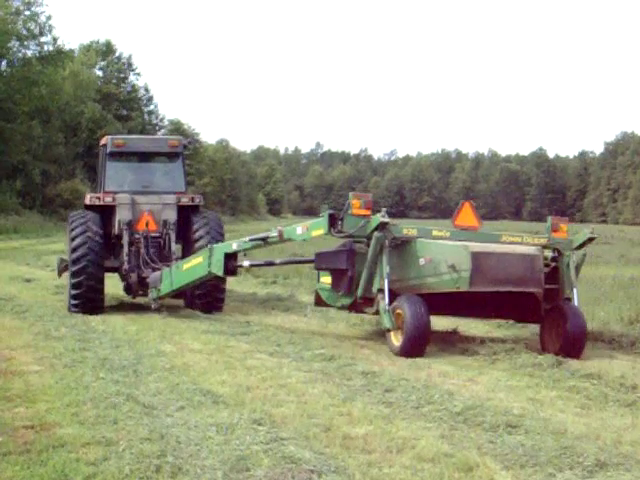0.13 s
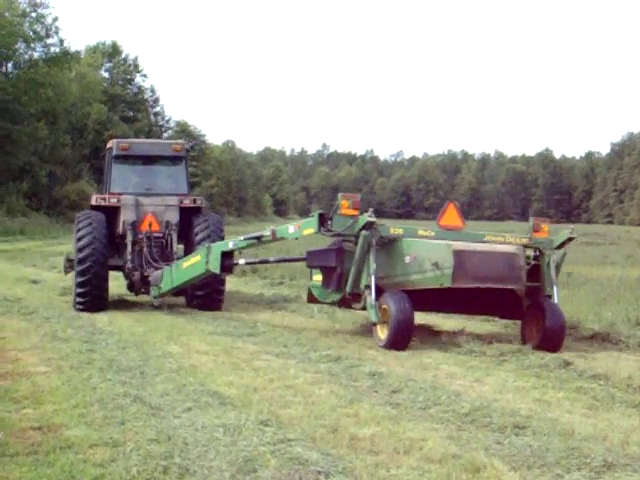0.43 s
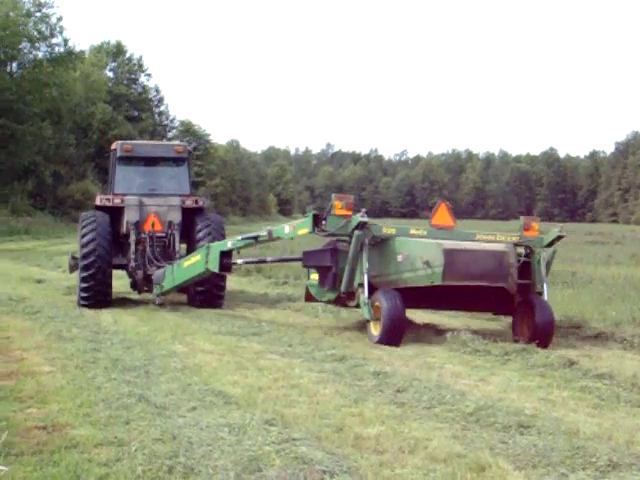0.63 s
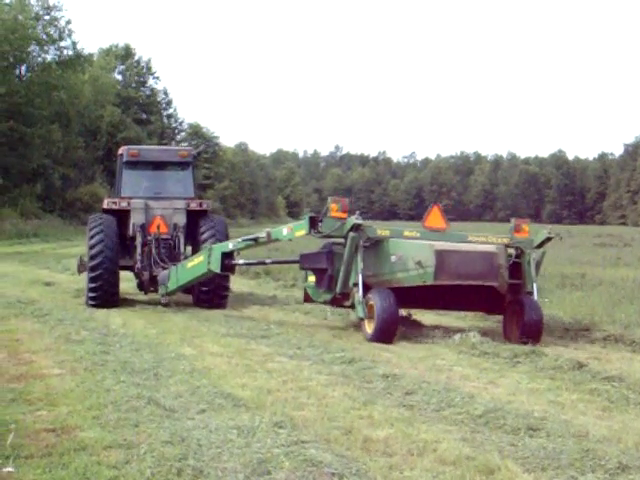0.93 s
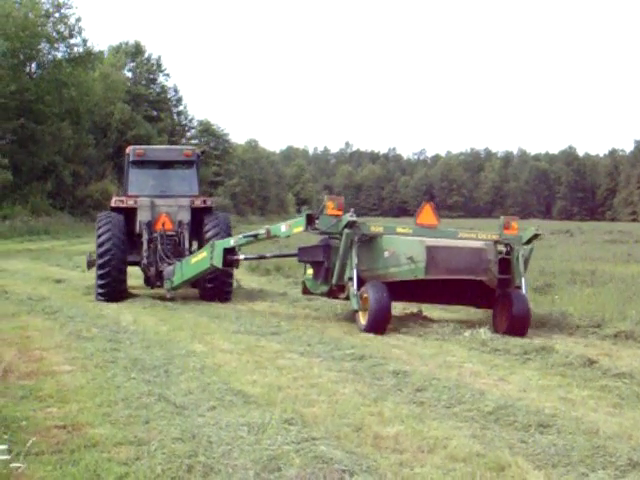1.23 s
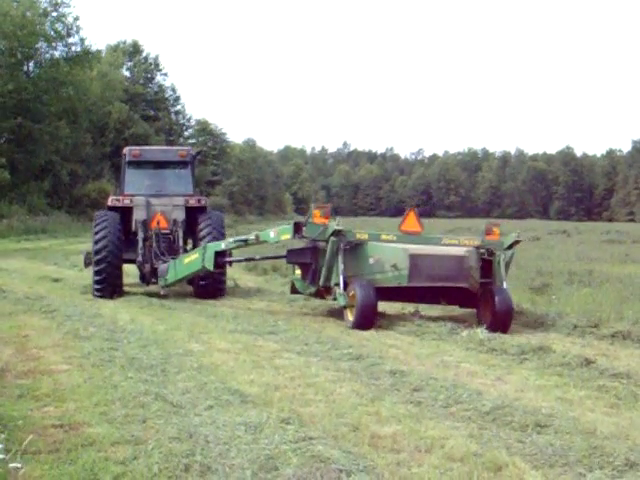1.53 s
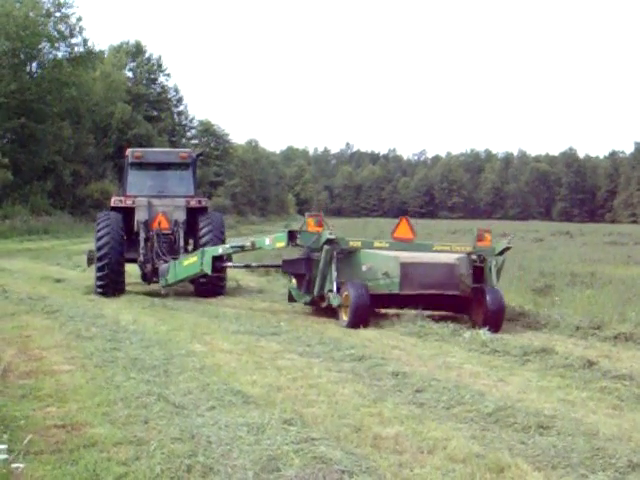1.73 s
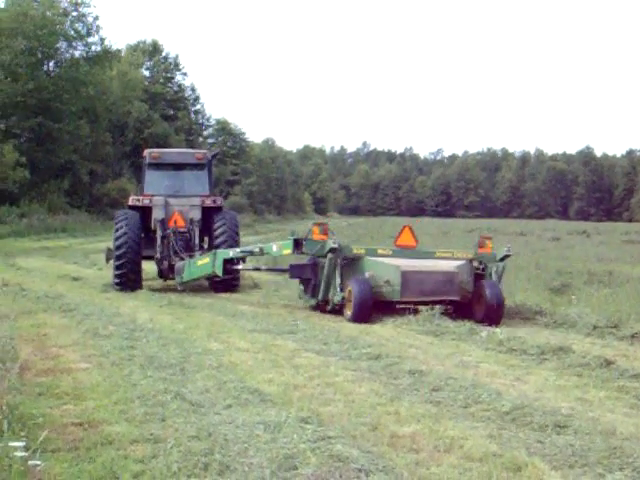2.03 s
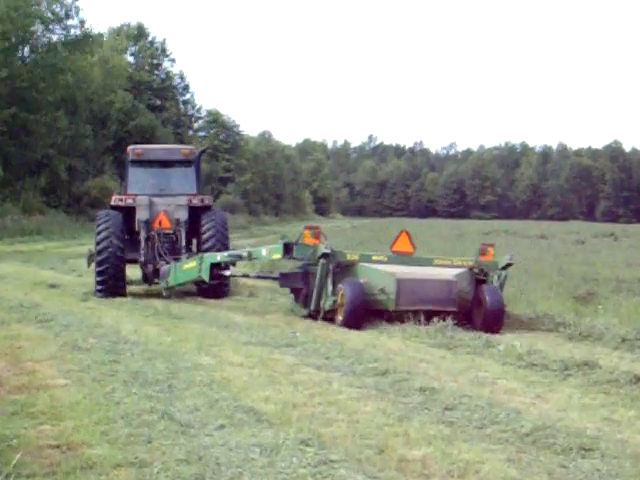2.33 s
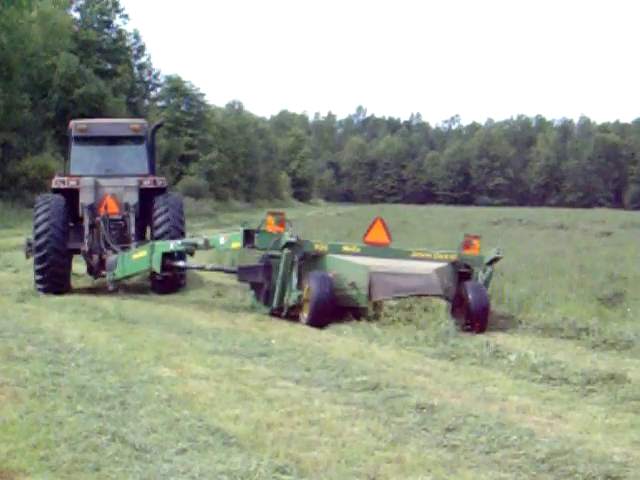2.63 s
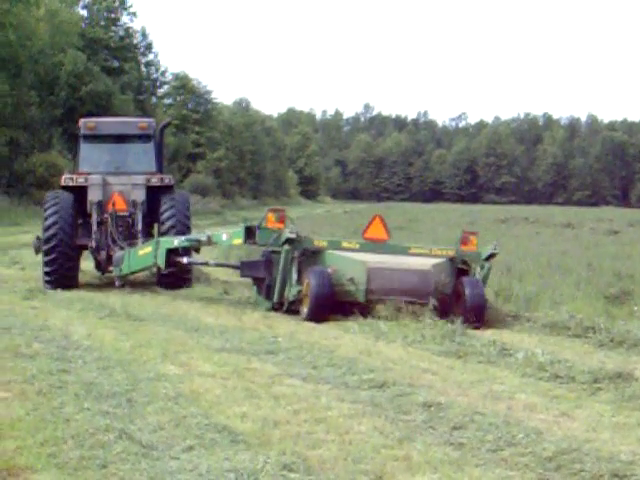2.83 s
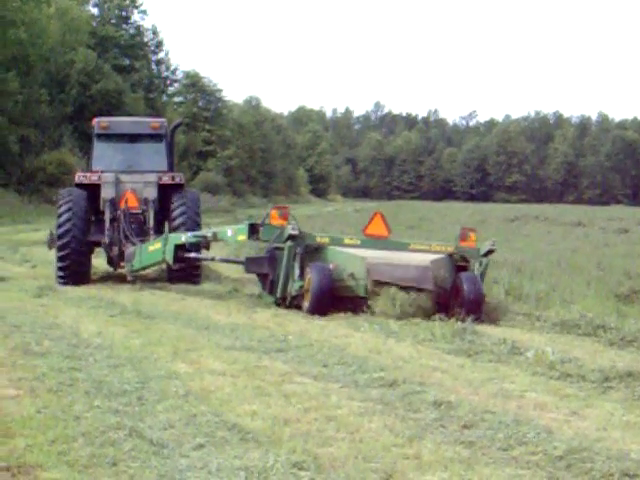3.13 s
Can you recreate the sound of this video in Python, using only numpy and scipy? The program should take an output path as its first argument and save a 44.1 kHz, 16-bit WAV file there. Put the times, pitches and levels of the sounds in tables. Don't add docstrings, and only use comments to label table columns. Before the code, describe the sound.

A disc mower hums and roars steadily behind a droning tractor, with one sharp stone crack

```python
import sys
import numpy as np
from scipy import signal
from scipy.fft import rfft, irfft, next_fast_len
from scipy.io import wavfile
from scipy.ndimage import uniform_filter1d, map_coordinates

SR = 44100
rng = np.random.default_rng(int(sys.argv[2]) if len(sys.argv) > 2 else 0)


def magnitude_from_level(level_db):
    exponent = np.asarray(level_db, float) / 20
    return 10 ** exponent


def dump_mix(stems):
    frames = np.atleast_2d(stems).T
    limited = np.clip(frames, -1, 1)
    pcm = np.round(limited * 32767).astype(np.int16)
    wavfile.write(sys.argv[1], SR, pcm)


N = 144648
T = np.arange(N) / SR


def unit(x):
    return x / np.sqrt(np.mean(x ** 2) + 1e-20)


def curves(rows):
    s, *cols = np.transpose(rows)
    return [np.interp(T, s, c) for c in cols]


def wobble(rate):
    return map_coordinates(rng.standard_normal(int(N * rate / SR) + 4), [T * rate])


def filtered(x, response):
    m = next_fast_len(N + 8192)
    spectrum = rfft(x, m) * response(np.fft.rfftfreq(m, 1 / SR))
    return irfft(spectrum, m)[:N]


def shape(points):
    f, db = np.transpose(points)
    return lambda hz: magnitude_from_level(np.interp(np.log(hz + 1), np.log(f + 1), db))


def body(peaks):
    def response(f):
        total = 0
        for k, (centre, width, db) in enumerate(peaks):
            mode = 1j * f * width / (centre * centre - f * f + 1j * f * width)
            total = total + (-1) ** k * magnitude_from_level(db) * mode
        return total
    return response


def patchy(depth_db):
    z = signal.stft(rng.standard_normal(N), nperseg=512)[2]
    field = uniform_filter1d(rng.standard_normal(z.shape), size=5, axis=0)
    field = uniform_filter1d(field, size=10, axis=1)
    return signal.istft(z * magnitude_from_level(depth_db * unit(field)), nperseg=512)[1][:N]


def shakes(rows, peaks):
    shake = sum(magnitude_from_level(db) * np.exp(-2 * ((T - s) / (.5 * length)) ** 2) for s, length, db in rows)
    return shake * unit(filtered(rng.standard_normal(N), body(peaks)))


# (frequency [Hz], density [dB per Hz])
RUMBLE_SPECTRUM = [(20, -14), (60, -6), (130, -2.5), (220, 0.5), (300, -2), (420, -7.5), (500, -13.5),
                   (700, -35.5)]
# (multiple of engine rate, level [dB])
FIRING_ORDERS = [(1, -0.5), (1.22, -12), (2.6, -3)]
ENGINE_HZ, ENGINE_DB, RUMBLE_DB = 111, -33, -24


def tractor():
    phase = 2 * np.pi * ENGINE_HZ * T
    drone = 0
    for k, db in FIRING_ORDERS:
        level = magnitude_from_level(ENGINE_DB + db + 1.8 * wobble(9.1))
        drone = drone + level * np.sin(k * phase + 0.51 * wobble(9.2))
    rumble = unit(filtered(rng.standard_normal(N), shape(RUMBLE_SPECTRUM)))
    return np.sqrt(2) * drone + magnitude_from_level(RUMBLE_DB + 0.94 * wobble(5)) * rumble


# (frequency [Hz], width [Hz], level [dB])
MESH_BANDS = [(2720, 35, -2), (3280, 50, -3), (3490, 30, -2), (3865, 35, 0)]
MESH_DB = -33


def gears():
    teeth = filtered(patchy(5.7), lambda f: body(MESH_BANDS)(f) ** 2)
    return magnitude_from_level(MESH_DB + 0.78 * wobble(5)) * unit(teeth)


# (time [s], length [s], level [dB])
HOWL_SWELLS = [(.1, .3, -19), (.55, .25, -18.5), (1.1, .35, -19.5), (1.6, .45, -18), (2.45, .25, -28),
               (2.98, .3, -22)]
# (frequency [Hz], width [Hz], level [dB])
GEARBOX_MODES = [(1105, 70, 0), (1175, 60, -4)]


def gearbox():
    return shakes(HOWL_SWELLS, GEARBOX_MODES)


# (time [s], length [s], level [dB])
RATTLE_EVENTS = [
    (.38, 0.043, -25),
    (.56, .1, -21.5),
    (.98, .06, -17.5),
    (1.5, 0.081, -18.5),
    (2.03, 0.055, -20),
    (2.27, 0.073, -21),
    (2.71, .04, -26),
    (2.86, 0.042, -21),
]
# (time [s], length [s], level [dB])
GUARD_RINGING = [(.45, .2, -28), (2.59, .04, -21), (2.8, .12, -21), (2.93, .12, -23), (3.04, .09, -22),
                 (3.2, .2, -23)]
# (frequency [Hz], width [Hz], level [dB])
GUARD_MODES = [(1545, 55, 0), (1670, 110, -9), (980, 200, -12)]


def guard():
    return shakes(RATTLE_EVENTS, GUARD_MODES) + shakes(GUARD_RINGING, GUARD_MODES[:1])


# (frequency [Hz], density [dB per Hz])
AIR_SPECTRUM = [(400, -36), (520, -27), (600, -8.5), (1000, -4), (1800, -10), (2120, -15), (3800, -10),
                (6700, -36.5)]
# (frequency [Hz], width [Hz], level [dB])
PANEL_MODES = [(827, 140, -6), (1125, 89, -3), (1630, 89, -7.5), (2632, 200, -9.5), (3290, 220, -10.5)]
# (time [s], level [dB])
ROAR_LEVEL = [(0, -18), (.42, -16.5), (.56, -15), (.7, -17), (.9, -17), (1.5, -16.5), (1.9, -17.5),
              (2.1, -16.5), (2.4, -18), (2.56, -16.5), (2.9, -17), (3.1, -18.5), (3.28, -19.5)]
PANEL_DB, CHOP_DEPTH = -4, .06


def deck(hz):
    level_db, = curves(ROAR_LEVEL)
    air = unit(filtered(patchy(1.3), shape(AIR_SPECTRUM)))
    ring = unit(filtered(patchy(2.4), body(PANEL_MODES)))
    pulse = 1 + CHOP_DEPTH * np.cos(4 * np.pi * np.cumsum(hz) / SR)
    level = magnitude_from_level(level_db + 0.52 * wobble(14) + 0.91 * wobble(34.73))
    return level * pulse * unit(air + magnitude_from_level(PANEL_DB) * ring)


SNAP_S, SNAP_DB, SNAP_T60_S, SNAP_HZ = 2.7495, 0, .02, 1400


def stone():
    t = np.maximum(T - SNAP_S, 0)
    grit_shape = shape([(800, -10), (2000, 0), (4000, -9), (5500, -30)])
    grit = unit(filtered(rng.standard_normal(N), grit_shape))
    decay = magnitude_from_level(SNAP_DB - 60 * t / SNAP_T60_S) * (T > SNAP_S)
    return decay * (.7 * np.sin(2 * np.pi * SNAP_HZ * t) + .4 * grit)


# (time [s], skipped time [s])
LOST_MOMENTS = [
    (2.521, .0038),
    (2.59, .0037),
    (2.725, .0052),
]
BLEND_S = .007


def tone(phase, hz):
    lost = sum(gap * (T > s) for s, gap in LOST_MOMENTS) * 2 * np.pi * hz
    blend = int(BLEND_S * SR) + 1
    c = uniform_filter1d(np.cos(lost), size=blend)
    s = uniform_filter1d(np.sin(lost), size=blend)
    return c * np.cos(phase) - s * np.sin(phase)


# (multiple of knife rate, level under third order [dB], extra once cutting [dB])
UPPER_ORDERS = [(4.01, -27, 8.5), (5.004, -17.5, -7), (6.014, -31.5, 0), (7.007, -25, 2), (8.02, -25, 4.5),
                (9.97, -23.5, -5.5), (11.9, -22, -2), (20.18, -20, -8.5), (21.53, -26.5, -21), (24, -46, 2)]
SINK_S, SINK_LASTS_S = 1.9, .3
FLUTTER_DB, WANDER_RAD = .8, .05


def knives(hz, levels_db):
    phase = 2 * np.pi * np.cumsum(hz) / SR
    cutting = np.clip((T - SINK_S) / SINK_LASTS_S, 0, 1)
    orders = [(k + 1, db) for k, db in enumerate(levels_db)]
    third_db = levels_db[2].mean()
    for k, db, more in UPPER_ORDERS:
        orders.append((round(k), third_db + db + more * cutting + 1.5 * wobble(9)))
    total = 0
    for k, db in orders:
        level = (-1) ** (k == 3) * magnitude_from_level(db + FLUTTER_DB * wobble(18))
        total = total + level * tone(k * (phase + WANDER_RAD * wobble(14)), k * hz[-1])
    return np.sqrt(2) * total


# (time [s], knife rate [Hz], first order level [dB], second [dB], third [dB])
KNIFE_ORDERS = [
    (0.0, 88.73, -28, -29, -10), (0.12, 87.85, -18, -15.5, -10), (0.5, 88.2, -19, -21.5, -11.5),
    (1.01, 88.44, -23, -18.5, -12), (1.76, 87.85, -20, -20.5, -9.5), (1.99, 87.78, -18.5, -29.5, -12.5),
    (2.07, 87.55, -16.5, -23, -14.5), (2.21, 87.22, -16.5, -30, -11), (2.48, 87.04, -18, -26, -9.5),
    (2.9, 87.7, -18.5, -22.5, -11.5), (3.008, 87.56, -20.5, -18.5, -10), (3.054, 87.24, -24, -24.5, -12.5),
    (3.096, 86.8, -18, -21.5, -10), (3.186, 86.65, -25.5, -25, -10), (3.22, 87.25, -19, -23.5, -11.5),
    (3.234, 86.4, -21, -23.5, -10), (3.268, 88.1, -26, -28, -11), (3.28, 88.6, -16.5, -18.5, -7),
]


def scene():
    hz, *levels_db = curves(KNIFE_ORDERS)
    metal = guard() + gearbox() + gears()
    return (knives(hz, levels_db) + deck(hz) + metal + tractor() + stone())[None]


# (start time [s], end time [s])
FULL_TREBLE = [(0, .53), (.67, .75), (1.0, 1.08), (1.14, 1.2), (1.36, 1.47), (1.52, 1.63), (1.66, 1.76),
               (2.89, 3.0), (3.15, 3.22)]


def starved(x):
    block = dict(fs=SR, nperseg=3072, noverlap=1536, window="cosine")
    full_below_hz, sparse_below_hz, keep_db, keep_swing_db = 5900, 6650, 6.3, 1.2
    hz, t, z = signal.stft(x, **block)
    hz = hz[:, None]
    usual = uniform_filter1d(uniform_filter1d(np.abs(z), size=9, axis=0), size=9, axis=1)
    threshold = usual * magnitude_from_level(keep_db + keep_swing_db * rng.standard_normal(len(t)))
    odd = (np.abs(z) > threshold) & (hz < sparse_below_hz)
    rich = sum((t > a) & (t < b) for a, b in FULL_TREBLE) > 0
    return signal.istft(z * (odd | rich | (hz < full_below_hz)), **block)[1][:N]


# (frequency [Hz], level [dB])
CAMERA_BAND = [(4500, 0.5), (5800, 1.5), (6500, -9.5), (7000, -21), (7400, -56.5), (7800, -120)]
# (time [s], length [s], level [dB])
FIZZ_BURSTS = [(.06, .07, -78), (.32, .06, -68), (.43, .07, -77), (.51, .01, -62), (.7, .06, -70),
               (1.17, .06, -77), (1.42, .06, -71), (1.57, .07, -68), (1.67, .006, -64), (1.72, .06, -74),
               (2.94, .07, -73), (3.18, .05, -80)]
# (frequency [Hz], width [Hz], level [dB])
FIZZ_MODES = [(11500, 7000, 0)]
DUCK_DB, DUCK_RECOVER_S = 9, .065


def roll_off(x):
    return signal.sosfilt(signal.butter(12, 15800, fs=SR, output="sos"), x)


def record(dry):
    t = np.maximum(T - SNAP_S + 0.00038, 0)
    duck_db = DUCK_DB * (1 - np.exp(-t / .002)) * np.exp(-t / DUCK_RECOVER_S)
    x = dry[0] * magnitude_from_level(-0.41 - duck_db)
    x = x / (1 + np.abs(x / .99) ** 5) ** (1 / 5)
    x = filtered(x, shape(CAMERA_BAND)) - .009
    x = np.clip(x + shakes(FIZZ_BURSTS, FIZZ_MODES), -1, 1)
    return roll_off(starved(x)[None])


dry = scene()
out = record(dry)
dump_mix(out)
```